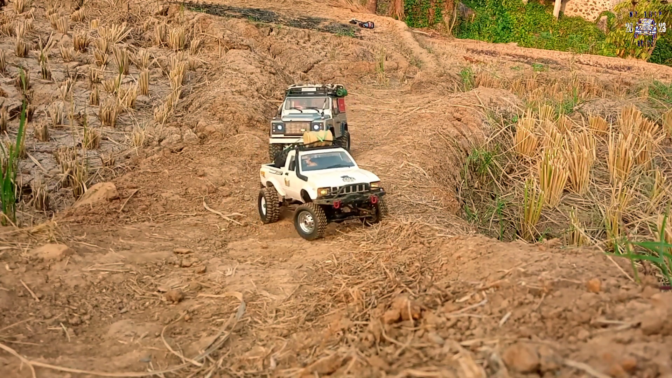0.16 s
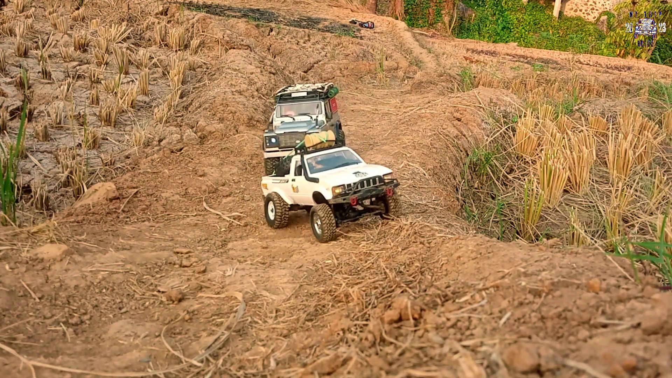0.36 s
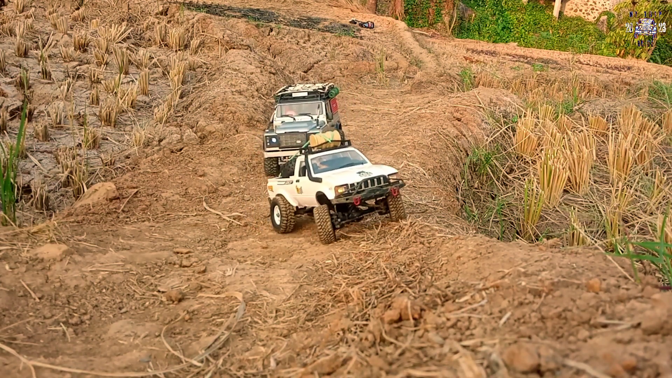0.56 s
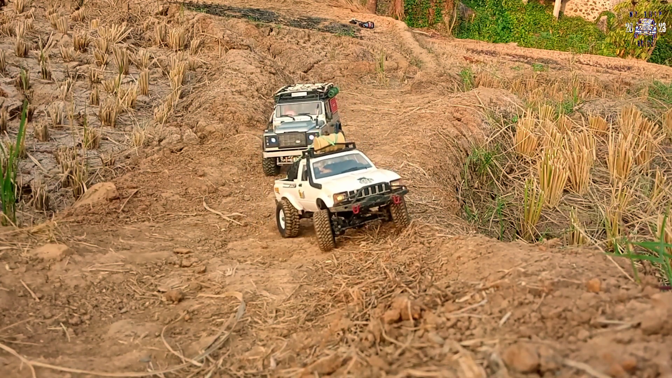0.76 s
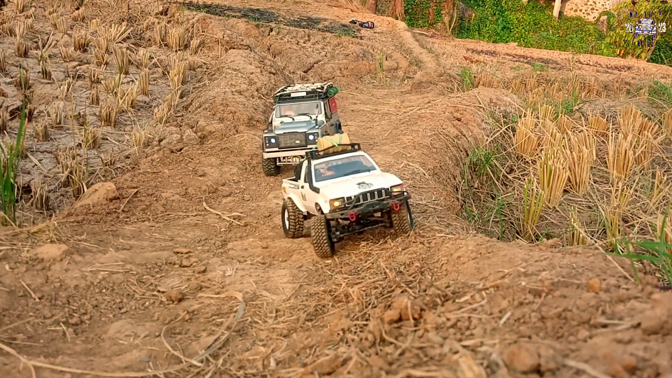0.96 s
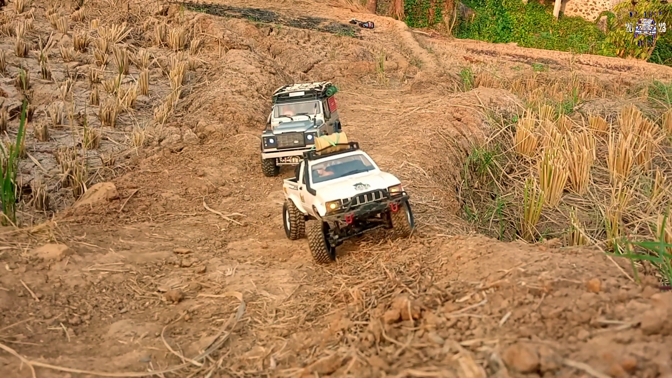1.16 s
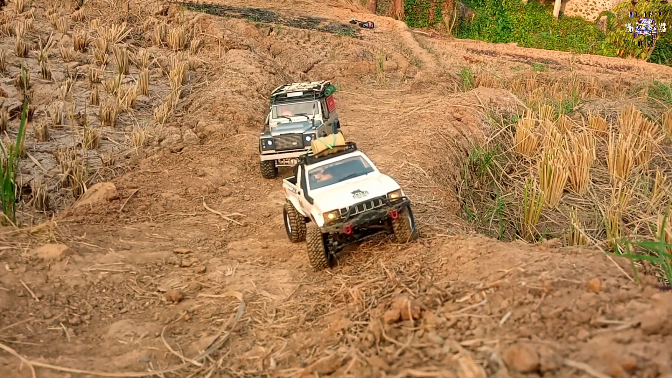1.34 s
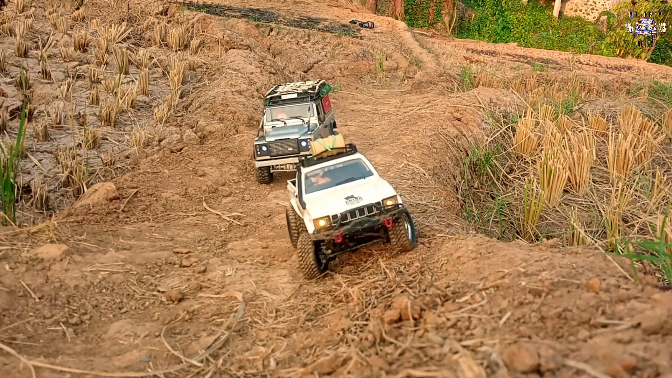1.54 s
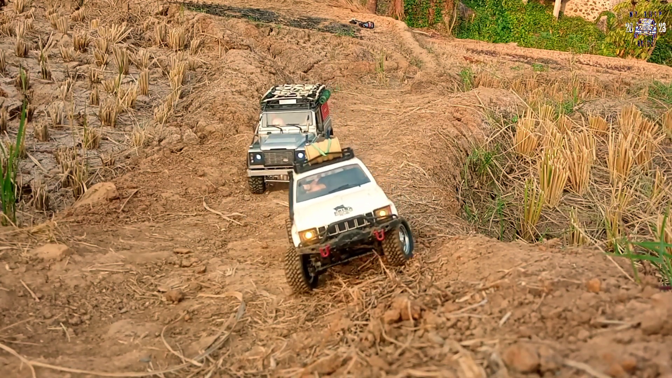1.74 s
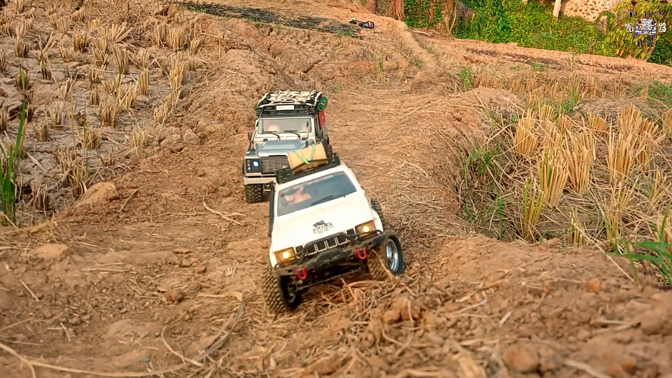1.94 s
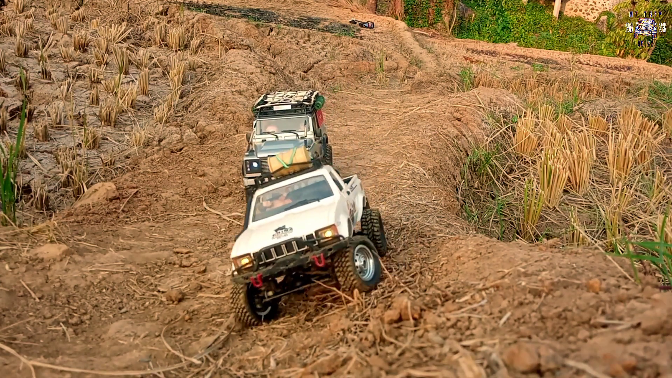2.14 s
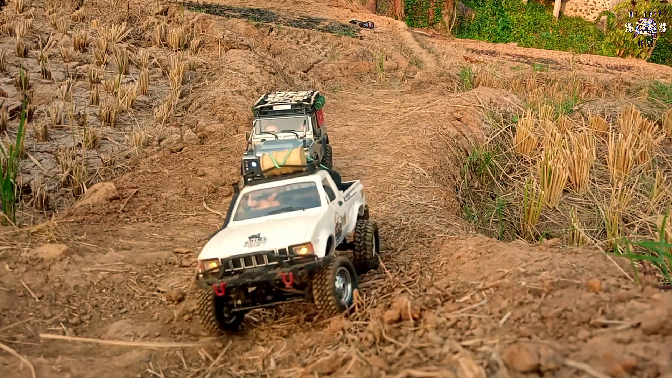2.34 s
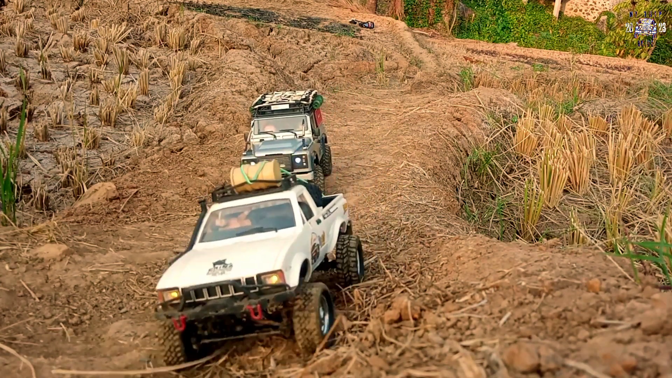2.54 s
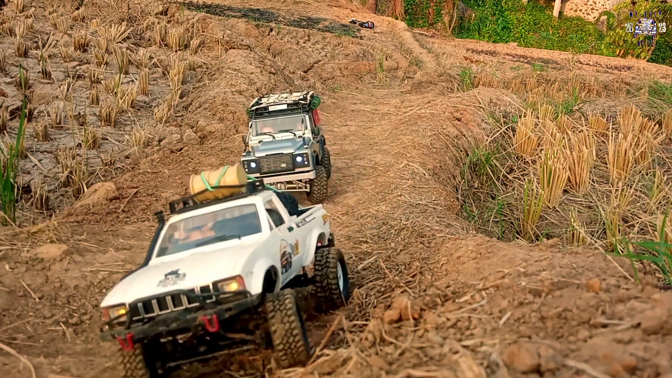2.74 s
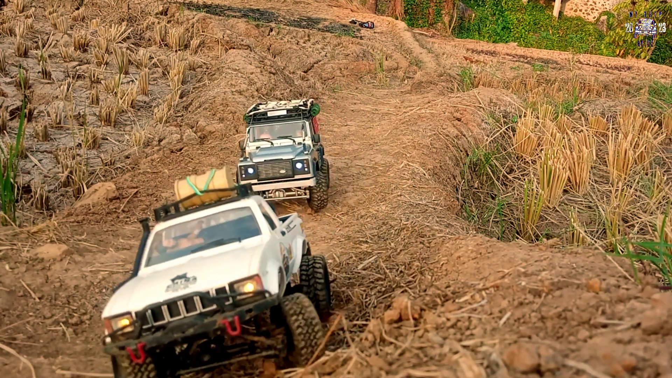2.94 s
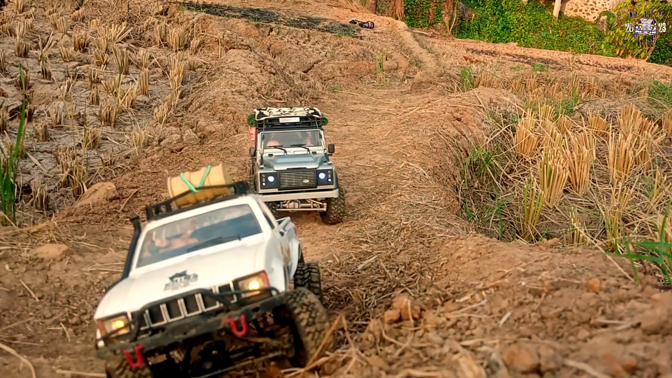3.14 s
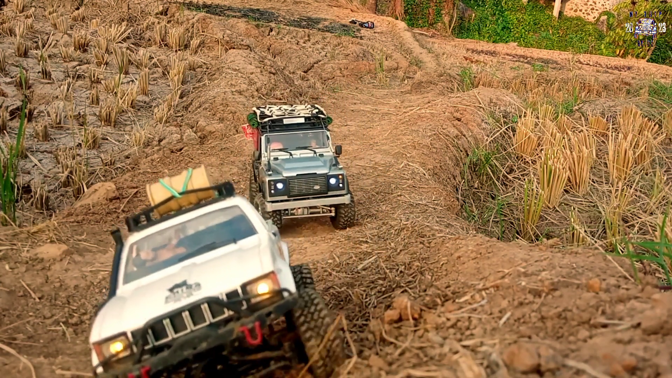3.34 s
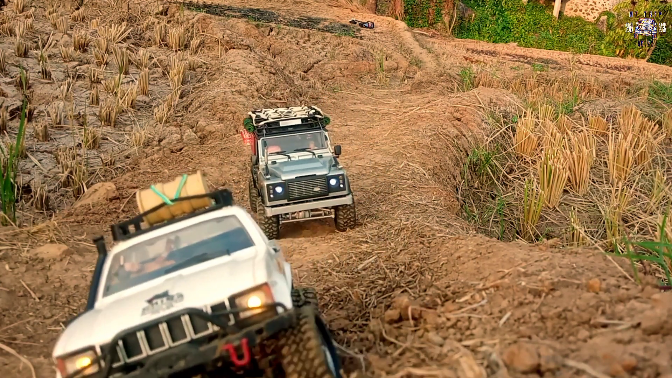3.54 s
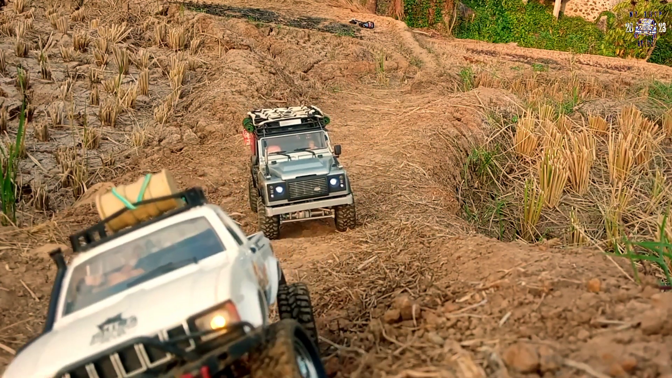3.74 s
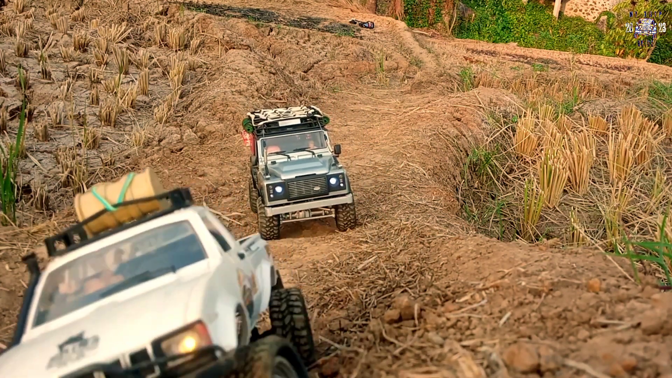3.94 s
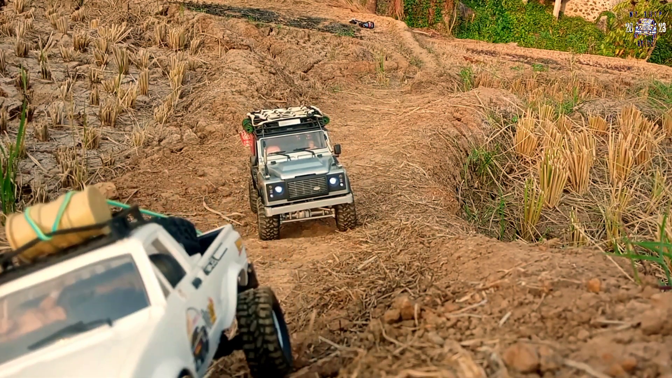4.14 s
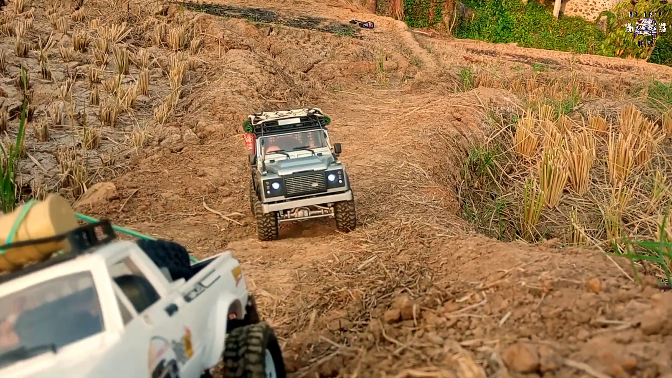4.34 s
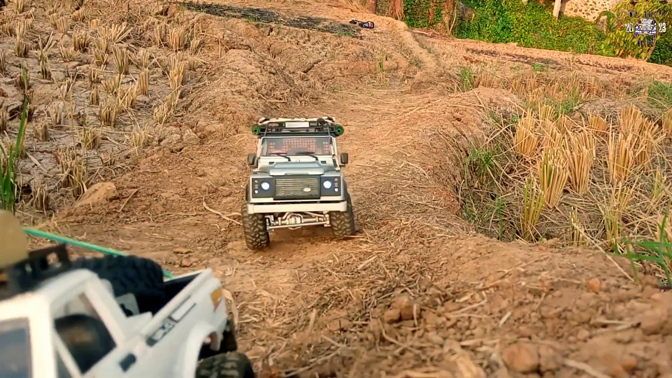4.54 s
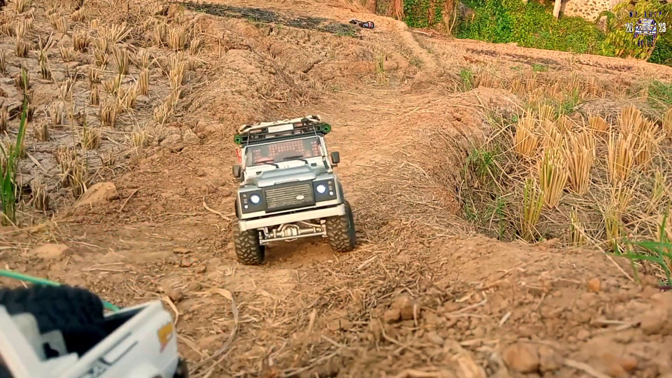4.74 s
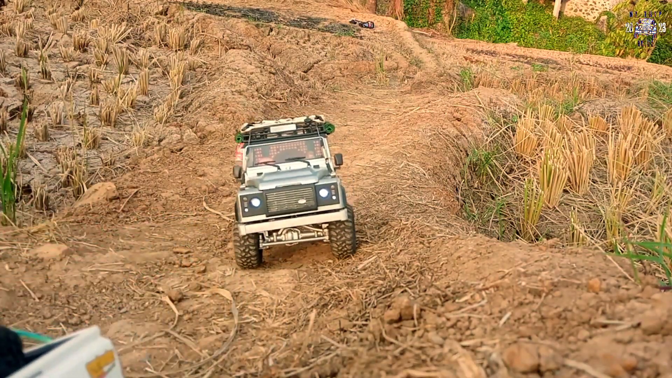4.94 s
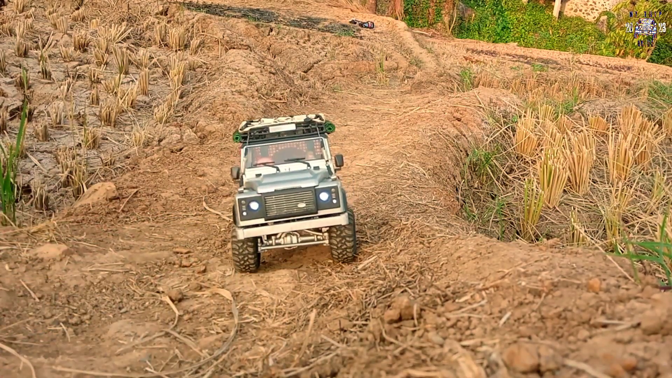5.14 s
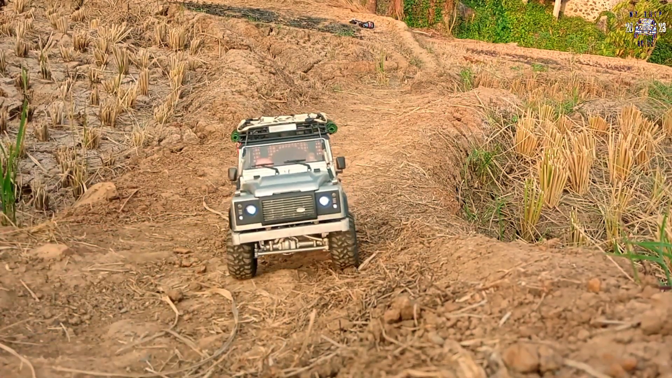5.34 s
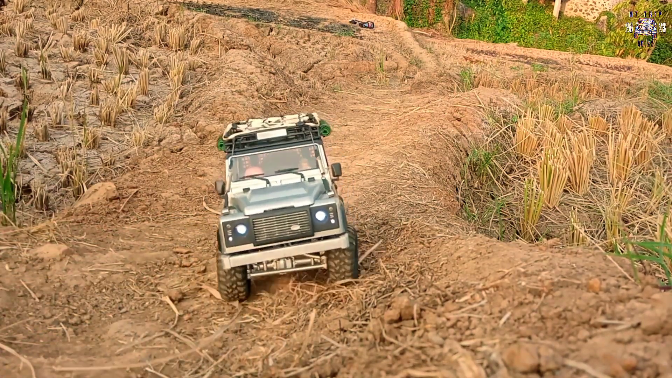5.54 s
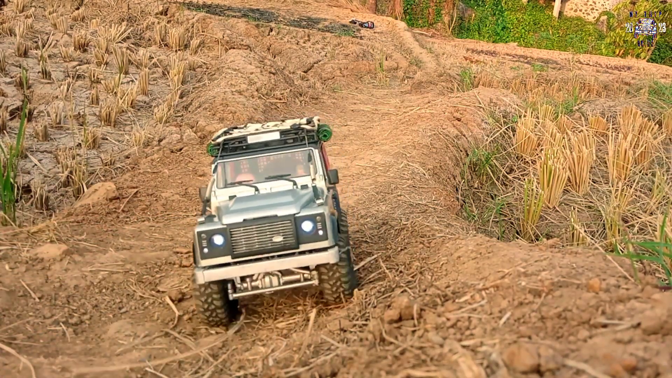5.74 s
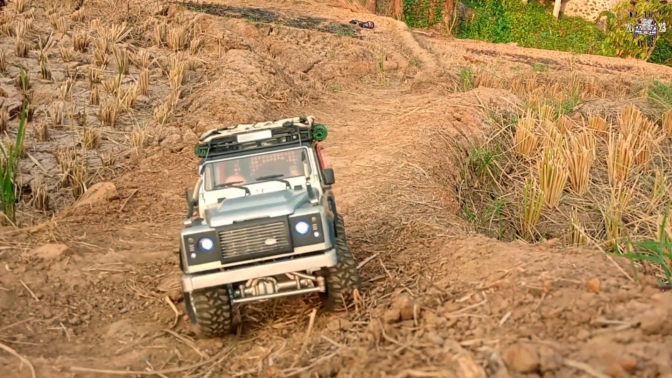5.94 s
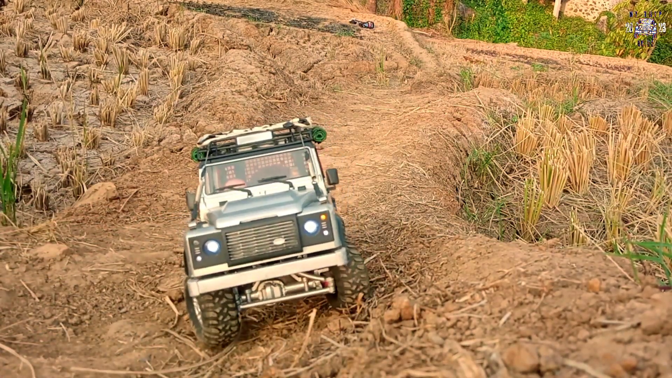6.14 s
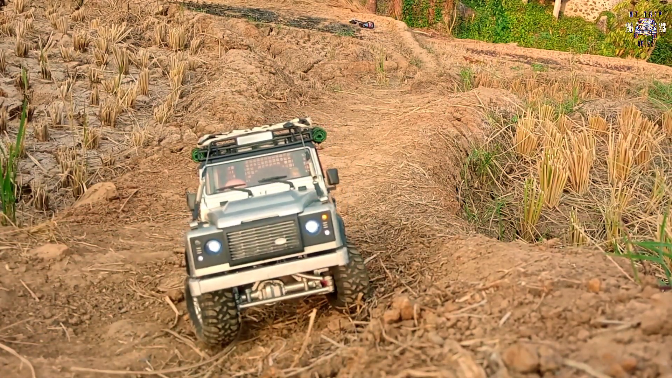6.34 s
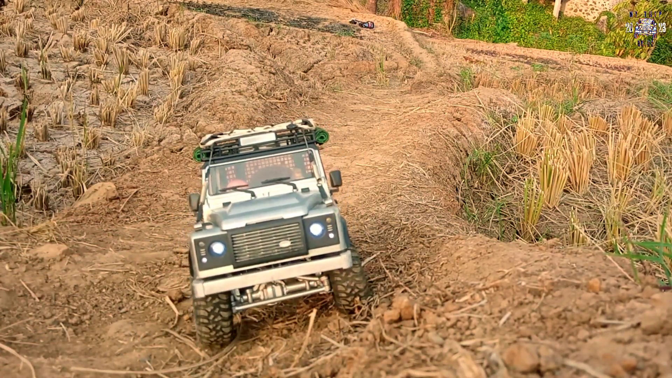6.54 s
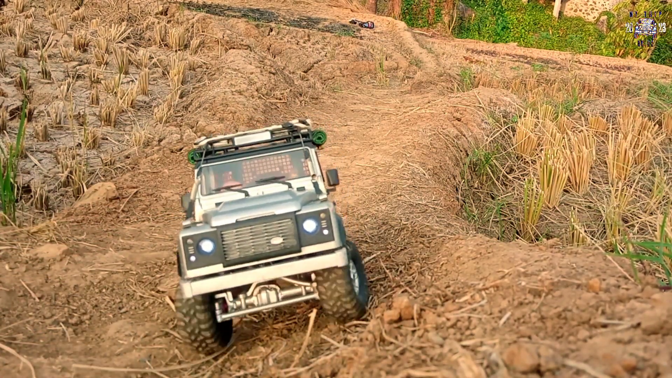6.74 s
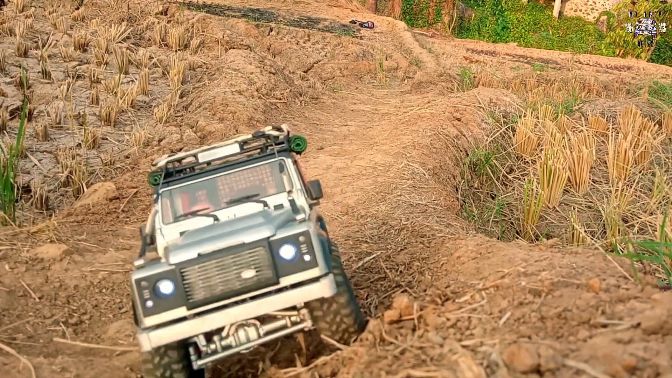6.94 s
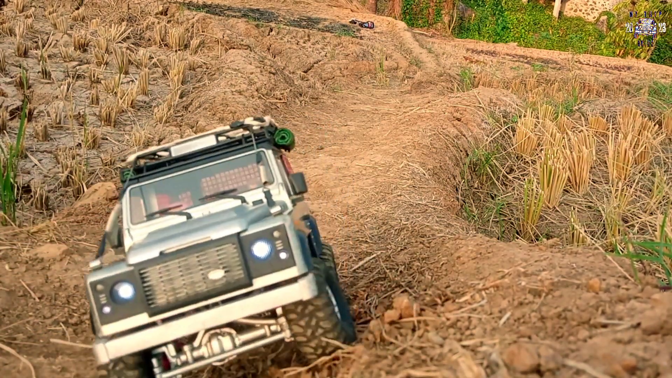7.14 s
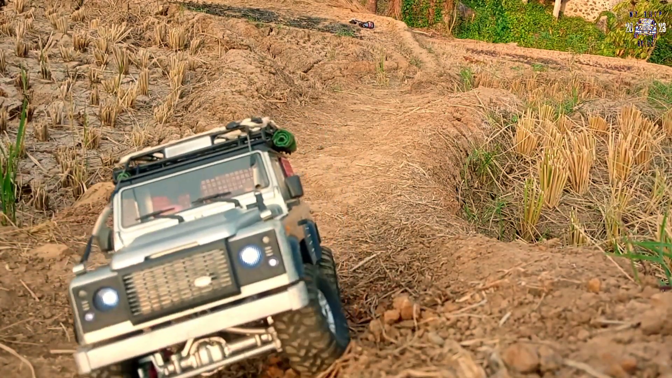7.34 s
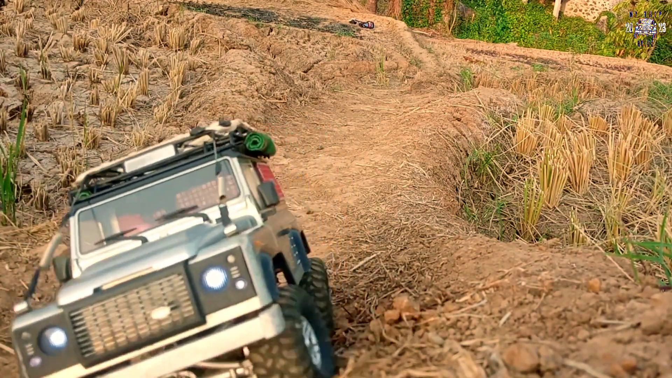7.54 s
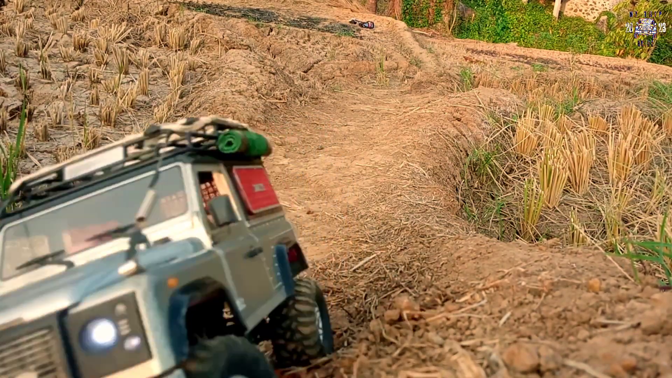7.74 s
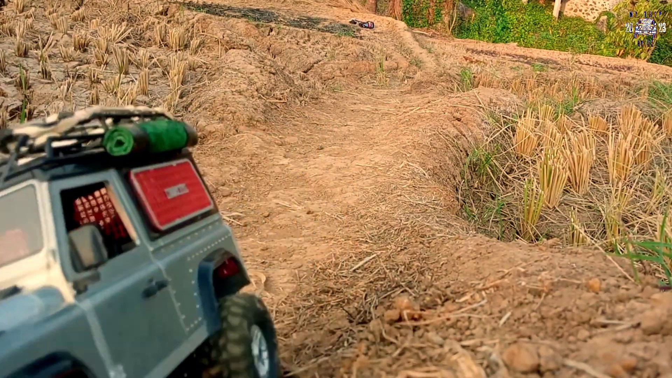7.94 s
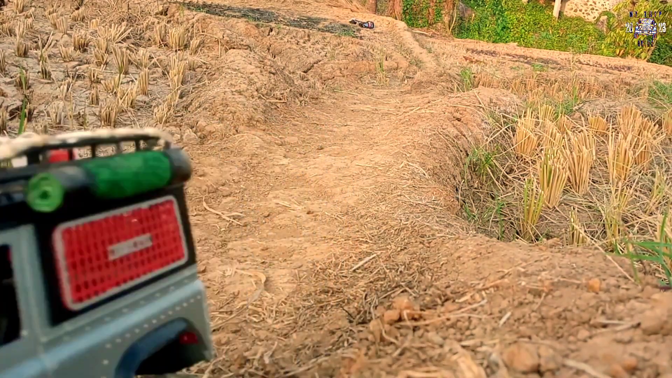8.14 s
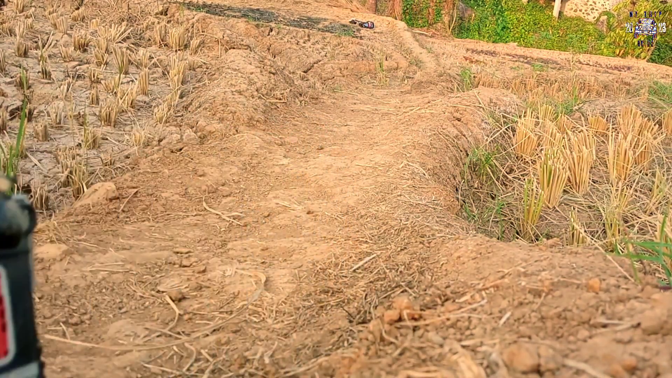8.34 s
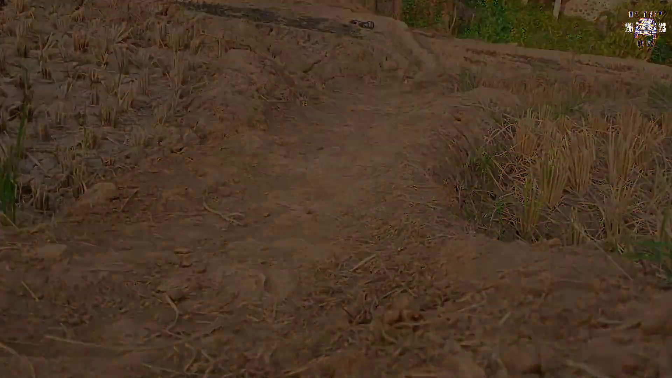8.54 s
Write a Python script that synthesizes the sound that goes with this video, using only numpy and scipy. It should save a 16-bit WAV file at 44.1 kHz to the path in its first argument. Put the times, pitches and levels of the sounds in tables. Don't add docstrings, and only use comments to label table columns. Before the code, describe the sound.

Thin motor-gear whine rises in uneven lurches as miniature off-road trucks grind over crumbly soil, pass close with two sharp snaps, then fade.

```python
import sys
import numpy as np
from scipy import signal
from scipy.fft import rfft, irfft, next_fast_len
from scipy.io import wavfile
from scipy.ndimage import uniform_filter1d

SR = 44100
rng = np.random.default_rng(int(sys.argv[2]) if len(sys.argv) > 2 else 0)


def wrap_up_sound(samples):
    columns = np.atleast_2d(samples).T
    tamed = np.clip(columns, -1, 1)
    steps = np.round(tamed * 32767).astype(np.int16)
    wavfile.write(sys.argv[1], SR, steps)


def makeup_ratio(level_db):
    decades = np.asarray(level_db, float) / 20
    return 10 ** decades


N = 383219

# [t/s, f/Hz]
THROTTLE = [(.16, 1850), (.38, 1680), (.6, 1720), (1.6, 2000), (1.74, 2250), (2.05, 2100), (2.4, 2200),
            (2.9, 2280), (3.0, 2050), (4.28, 2050), (4.36, 2380), (4.7, 2250), (5.2, 2250), (5.4, 1900),
            (5.535, 2150), (5.595, 3010), (6.4, 3250), (7.8, 3200)]
# [t/s, change/Hz, half
# length/s]
LURCHES = [(.118, 720, .06), (.51, 500, .075), (1.689, 330, .06), (1.834, 250, .055),
           (1.904, 320, .04), (1.994, -180, .04), (2.078, 100, .04), (2.177, 340, .03),
           (2.47, 300, .08), (2.56, 250, .06), (2.62, 400, .06), (2.7, 1000, .09), (2.8, 260, .045),
           (2.93, 850, .03), (3.375, 830, .055), (3.518, 800, .06), (3.595, -200, .04),
           (4.225, 450, .04), (4.368, 240, .04), (4.41, 140, .09), (4.9, 130, .09), (4.444, 200, .04),
           (4.49, 580, .035), (4.545, -200, .03), (4.618, 330, .04), (4.77, 250, .05),
           (4.818, 850, .05), (4.905, 420, .03), (4.966, 410, .035), (5.005, -150, .03),
           (5.129, 210, .1), (5.235, 130, .03), (5.285, -290, .035), (5.465, 620, .04),
           (5.632, 201, 0.042), (5.695, -330, 0.044), (5.8, -380, 0.053), (5.92, 450.5, .075),
                (6.0, 379, 0.059), (6.105, -480, 0.069), (6.238, 349.5, .045), (6.31, -830, 0.042),
                (6.35, -500, .04), (6.455, -180, .04), (6.58, 270, 0.051), (6.664, 400.5, .035),
                (6.728, 180, 0.029), (6.824, 551, 0.039), (6.87, -130, .03), (6.93, 379.5, .05),
                (6.98, 480, 0.046), (7.036, -140, 0.039), (7.105, 169.5, 0.059), (7.259, 281, 0.042),
                (7.361, 519.5, .045), (7.435, -500, 0.059), (7.526, 311, 0.039), (7.573, -140, .03),
                (7.63, 218.5, .04), (7.689, -320, 0.041), (7.75, 200, .045), (7.88, -950, .065),
                (7.96, -350, .07), (8.04, -650, 0.062)]
# [from/s, to/s, whine level/dB]
TEETH_PRESSED = [(.09, 0.169, -35), (.15, .285, -41), (.39, 0.534, -40.5), (.68, 0.995, -53),
                 (1.66, 2.02, -36), (2.048, 2.119, -38), (2.142, 2.22, -39), (2.357, 2.533, -38.5),
                 (2.52, 2.597, -43), (2.583, 2.792, -45.5), (2.77, 2.849, -40.5), (2.827, 2.984, -41.5),
                 (3.213, 3.253, -34), (3.34, 3.403, -46), (3.422, 3.47, -38), (3.46, 3.66, -37),
                 (4.19, 4.27, -35.5), (4.32, 4.556, -34.5), (4.551, 4.764, -36), (4.745, 5.008, -28),
                 (5.017, 5.27, -27.5), (5.252, 5.332, -31), (5.31, 5.364, -27), (5.34, 5.45, -33),
                 (5.43, 5.49, -29.5), (5.475, 5.513, -27), (5.51, 5.561, -25.5), (5.544, 5.598, -28),
                 (5.58, 5.681, -27), (5.659, 5.73, -28), (5.706, 5.786, -29), (5.756, 5.9, -34.5),
                 (5.892, 5.997, -27.5), (5.99, 6.079, -27.5), (6.058, 6.125, -29), (6.143, 6.283, -30),
                 (6.26, 6.323, -34), (6.338, 6.399, -29), (6.382, 6.564, -27.5), (6.57, 6.617, -30),
                 (6.65, 6.709, -31), (6.688, 6.753, -37.5), (6.743, 6.799, -31.5), (6.804, 6.863, -29),
                 (6.85, 6.914, -34), (6.898, 7.012, -35), (7.001, 7.073, -42), (7.062, 7.195, -34.5),
                 (7.211, 7.34, -35), (7.344, 7.406, -35), (7.388, 7.5, -33.5), (7.488, 7.56, -36.5),
                 (7.54, 7.622, -40), (7.603, 7.666, -36), (7.649, 7.734, -33), (7.715, 7.844, -37),
                 (7.82, 7.9, -38), (7.891, 8.05, -43.5), (8.035, 8.092, -33)]
# [f/Hz, level/dB]
WHINE_PATH = [(1700, -5), (2200, 0), (2550, -1), (2800, -4), (3150, 5), (3450, 6), (3800, 2)]
# [t/s, gear hiss level/dB, gearbox level over #
# the hiss/dB]
NEARNESS = [(.1, -43, 4), (.94, -48, 0), (1.15, -53.5, 3), (1.86, -44, 8), (2.35, -43.5, -5),
            (2.46, -40, -13), (2.98, -36.5, -10), (3.1, -41, 1), (3.56, -38, -15), (3.85, -41, -23),
            (4.5, -33.5, 8.5), (5.08, -37.5, 14.5), (5.5, -36, 8), (5.6, -27, 1.5), (7.75, -31, -5),
            (8.38, -34, -6.5), (8.45, -55, 4), (8.69, -67, 0)]
# [t/s, level/dB, half length/s]
HISS_SWELLS = [(0, -4.5, 0.21), (4.79, 1, 0.06), (5.96, 2.5, 0.18), (6.29, -0.5, .04), (6.61, 1, 0.11),
               (7.53, -2, 0.028), (7.89, 2, 0.064), (8.05, 5, 0.13), (8.13, -3.5, 0.086), (8.23, 4.5, 0.038),
               (8.29, -1, .03), (8.37, 2.5, 0.034)]
# [multiple, level/dB, blur/Hz]
MULTIPLES = [(.5, -4, 90), (.62, -7, 120), (1.5, -7, 240), (2.45, -8, 350), (3, -6.5, 240), (3.5, -9, 400),
             (3.8, -9, 450)]
# [f/Hz, level/dB]
MULTIPLE_PATH = [(3900, 0.5), (4600, 1.5), (5200, -5), (7000, 1), (8000, -2.5), (11000, 3.5), (13000, -11)]
# [f/Hz, level/dB]
OCTAVE_PATH = [(4300, -32), (4900, -20), (5500, -15), (6600, -13), (7000, -17), (7600, -22)]
# [f/Hz, level/dB per Hz]
HISS_FRONT = [(2290, -25), (3900, -8), (4020, -11), (4510, -10), (5010, -16), (5500, -10), (6940, -10.5),
              (8710, -2.5), (10300, -7.5), (15000, -27), (15700, -17)]
# [f/Hz, level/dB per Hz]
HISS_BEHIND = [(2290, -15.5), (3900, -10), (5530, -21), (6590, -14), (7150, -17.5), (8760, -2),
               (10800, -31.5), (11800, -25), (13000, -22), (15700, -32)]
# [f/Hz, width/Hz, lift/dB]
SHELL = [(1324, 210, 13), (1850, 40, 7.5), (3403, 710, 12), (5640, 300, 2), (6300, 130, 0),
         (7520, 160, 2.5), (8450, 200, 3), (9400, 180, -3.5), (9530, 240, 4.5), (11330, 310, 4)]
# [f/Hz, width/Hz, level/dB]
GEARBOX = [(3280, 410, 6.5), (3437, 31, 7), (3750, 180, -4.5)]
# [from/s, to/s, from f/Hz, to f/Hz, level/dB]
PANELS = [(.7, 0.962, 3480, 3290, -43), (.79, 0.958, 2520, 2450, -49), (2.28, 2.62, 11400, 11700, -56),
          (2.42, 2.47, 12100, 12200, -52), (2.4, 2.63, 3460, 3920, -47), (2.6, 2.774, 9400, 9600, -39),
          (3.1, 3.8, 11200, 11400, -54), (3.34, 3.44, 8700, 9000, -44), (3.35, 3.45, 14800, 15100, -58),
          (4.1, 4.5, 9650, 9540, -47), (4.28, 4.88, 11300, 11600, -48), (4.35, 4.75, 13500, 13200, -56),
          (0, 0.503, 3550, 3510, -45), (4.3, 4.648, 3760, 3900, -39.5), (5.42, 5.56, 4250, 4400, -41),
          (5.56, 5.92, 4550, 4320, -40), (5.8, 6.3, 5610, 5570, -43.5), (5.551, 6.12, 1500, 1450, -42.5),
          (6.3, 7.05, 1850, 1850, -43), (5.85, 5.995, 8300, 9000, -25.5), (6.213, 6.268, 8700, 8800, -38),
          (6.35, 6.5, 10900, 11400, -44), (6.451, 6.599, 9500, 10480, -41), (6.491, 6.678, 8000, 8870, -34),
          (6.699, 6.83, 10000, 9900, -31), (6.89, 7.0, 8560, 9200, -33), (6.88, 6.998, 10200, 11200, -38),
          (6.9, 7.0, 7230, 7600, -38), (7.019, 7.122, 9400, 9900, -36), (7.2, 7.357, 10060, 11200, -37),
          (7.46, 7.56, 8900, 8600, -38), (7.46, 7.56, 10100, 10600, -35)]
# [from/s, to/s, f/Hz, level/dB]
GEAR_TONES = [(.78, 1.053, 1590, -49), (2.617, 2.698, 1500, -46), (3.35, 3.427, 5910, -46),
              (2.45, 2.582, 1588, -47), (5.701, 5.832, 1498, -39), (5.901, 5.979, 1720, -38),
              (6.22, 6.27, 1800, -36), (6.9, 6.948, 1850, -38), (7.49, 7.54, 1795, -37.5),
              (7.9, 8.001, 3480, -47), (6.42, 6.501, 1900, -41), (6.55, 6.688, 1820, -34),
              (6.792, 6.839, 1867, -28.5), (6.948, 7.01, 1880, -30), (7.329, 7.38, 1850, -35),
              (8.203, 8.243, 3800, -37), (8.26, 8.32, 6600, -39)]
# [t/s, level/dB]
SERVO = [
    [(7.6, -56), (7.728, -45), (8.35, -61)],
]
# [f/Hz, level/dB per Hz]
SOIL = [(210, -14), (350, -15), (394, -8.5), (493, -8.5), (585, -15.5), (724, -4), (1610, -1.5),
        (2220, -2.5), (3410, -5), (4500, -17.5), (5850, -27), (9900, -120)]
# [from/s, to/s, extra level/dB]
LOOSE_SOIL = (4.4, 6.34, 2.74)
# [from/s, to/s, level/dB, f/Hz, half width/Hz]
SCRAPE = (8, 8.5, -41, 691, 398)
# [t/s, peak level/dB, f/Hz]
CLODS = [(0.089, -13.5, 824), (0.184, -15, 1290), (0.267, -16, 2000), (0.382, -16, 1000),
         (0.794, -17.5, 1170), (1.89, -27, 2530), (2.451, -14, 2470), (2.509, -29, 1606),
         (2.899, -11, 1500), (2.969, -13, 1268), (3.152, -14, 900), (3.791, -29, 2540), (3.989, -21, 1410),
         (4.046, -9, 1240), (4.207, -11.5, 2400), (4.977, -8, 2380), (5.433, -8, 2320), (5.983, -3.5, 1850),
         (6.039, -6.5, 1180), (6.083, -15, 2773), (6.345, -9, 2880), (6.566, -6, 2900),
         (6.904, -11.5, 1820), (7.809, -9.5, 2350), (7.991, -13, 2766), (8.007, -11, 754),
         (8.233, -8, 2490), (8.438, -23, 2590), (8.481, -22, 1850), (8.598, -18.5, 2600)]
# [t/s, peak level/dB]
GRIT_CRACKS = [
    (0.5871, -32),
    (2.4488, -25),
    (2.9627, -24),
    (5.4321, -18),
    (5.5864, -17),
    (5.9833, -10),
    (6.5656, -13),
    (7.9994, -21),
]
# [t/s, peak level/dB]
SNAPS = [
    (8.108, -3),
    (8.385, -3.5),
]
# [f/Hz, level/dB, time to fall 60 dB/s]
STALK = [(2650, -2.5, 0.041), (3170, 7.5, 0.011), (4980, -18, 0.023), (5560, -31, 0.022), (7700, -11, 0.03),
         (8200, -6, 0.02)]
# [t/s, peak level/dB, f/Hz]
KNOCKS = [
    (4.551, -28, 740),
    (4.8, -27, 648.5),
    (6.96, -25.5, 690),
    (7.74, -22, 709.3),
    (8.09, -24, 445),
    (8.26, -21.5, 653),
]
# [t/s, peak level/dB, f/Hz, time to fall 60 dB/s]
STAND_BUMP = (8.339, -15, 82, .12)
# [t/s, level/dB]
DRONE = [
    (0.0, -43),
    (0.02, -37),
    (2.76, -37),
    (2.95, -35),
    (6.41, -37),
    (8.3, -33),
    (8.35, -30.5),
    (8.42, -43),
    (8.69, -41.5),
]
# [f/Hz, level/dB per Hz]
RUMBLE = [(15, -58), (25, -22), (37, -32), (52, -13.5), (75, -3.5), (156, 3), (259, -5), (306, -4.5),
          (395, -12.5), (494, -11), (574, -14), (687, -14.5), (900, -29), (1170, -25), (1980, -120)]
# [from f/Hz, to f/Hz, level/dB, from/s, to/s]
ENGINE_TONES = [(356, 366, -52, 0.526, 1.7), (417, 710, -72, 0.23, 1), (483, 486, -50.5, 0.15, 1.52),
                (557, 420, -56, 0.088, 1.3), (299, 312, -47.5, 1.46, 5.2), (155.4, 166, -43.5, 2.28, 8.4),
                (209.5, 150, -49, 1.1, 2.4), (193.4, 240, -45, 4.3, 6.1), (1031, 1012, -56.5, 0.32, 6.36)]
# [f/Hz, level/dB per Hz]
INSECTS = [(9000, -30), (10500, -11), (11600, -9), (13000, 2), (15500, -8)]
# [f/Hz, level/dB per Hz]
AIR = [(180, -41), (300, 4), (710, 4.5), (1250, -35), (2670, -9), (2950, -51), (5440, -5.5), (8790, 4),
       (15700, -60)]

TEETH = 12
IDLE_DB, BITE_S = -68, .022
SLIP_DB_PER_KHZ = 5.5
CRUSH_DB, CRUSH_GROWS = -36.5, 0.34
CASE_HZ, CASE_WIDTH_HZ, CASE_FEEDS = 3450, 400, .7


def unit(x):
    return x / np.sqrt(np.mean(np.abs(x) ** 2) + 1e-20)


def along(points, hz):
    f, v = np.transpose(points)
    return np.interp(np.log(hz + 1), np.log(f + 1), v)


def curves(rows, round_s=.01):
    s, *cols = np.transpose(rows)
    t = np.arange(N) / SR
    return [uniform_filter1d(np.interp(t, s, c), int(round_s * SR)) for c in cols]


def wobble(rate):
    place = np.arange(N) * rate / SR
    knot = place.astype(int)
    knots = rng.standard_normal(int(place[-1]) + 2)
    share = place - knot
    eased = share * share * (3 - 2 * share)
    return unit(knots[knot] + eased * np.diff(knots)[knot])


def gate(start, end, edge_s):
    t = np.arange(N) / SR
    return np.clip(np.minimum(t - start, end - t) / edge_s, 0, 1)


def bumps(rows):
    out = np.zeros(N)
    for s, height, half_s in rows:
        u = np.arange(-1, 1, 1 / (half_s * SR))
        u = u[round(max(half_s - s, 0) * SR):]
        add(out, max(s - half_s, 0), height * np.cos(np.pi * u / 2) ** 2)
    return out


def noise():
    return rng.standard_normal(N)


def filtered(x, response):
    m = next_fast_len(N + 8192)
    spectrum = rfft(x, m) * response(np.fft.rfftfreq(m, 1 / SR))
    return unit(irfft(spectrum, m)[:N])


def shaped(x, points):
    return filtered(x, lambda f: makeup_ratio(along(points, f)))


def around(f, hz, width):
    return 1 / (1 + ((f - hz) / width) ** 4)


def resonance(f, hz, width):
    return 1 / (1 + ((f - hz) / width * 2) ** 2)


def patchy(patchy_db):
    z = signal.stft(rng.standard_normal(N + 512), nperseg=256)[2]
    field = uniform_filter1d(rng.standard_normal(z.shape), size=2, axis=0)
    field = uniform_filter1d(field, size=16, axis=1)
    return signal.istft(z * makeup_ratio(patchy_db * unit(field)), nperseg=256)[1][:N]


def add(out, s, sound):
    part = out[round(s * SR):][:len(sound)]
    part += sound[:len(part)]


def whine(hz, db, shake, flutter_db):
    phase = 2 * np.pi * np.cumsum(hz) / SR
    size = makeup_ratio(db + flutter_db * wobble(140))
    return np.sqrt(2) * size * np.sin(phase + shake * wobble(300)), phase


def motion():
    lurch = bumps(LURCHES)
    hz = curves(THROTTLE)[0] + lurch
    pressed_db = np.max([(db - IDLE_DB) * gate(start - BITE_S / 2, end, BITE_S)
                         for start, end, db in TEETH_PRESSED], axis=0)
    whine_db = IDLE_DB + pressed_db + along(WHINE_PATH, hz)
    hiss_db, ring_db = curves(NEARNESS)
    hiss_db = hiss_db + SLIP_DB_PER_KHZ * lurch / 1000 + bumps(HISS_SWELLS)
    return hz, whine_db, hiss_db, ring_db


def shell_lift(f):
    return sum(lift_db * resonance(f, hz, width) for hz, width, lift_db in SHELL)


def tooth_multiples(hz, phase, db, hiss_db, ring_db, turning):
    out = np.zeros(N)
    for k, rel_db, blur in MULTIPLES:
        radiated_db = np.maximum(along(HISS_FRONT, k * hz), -14) + shell_lift(k * hz)
        in_case = around(k * hz, CASE_HZ, CASE_WIDTH_HZ)
        radiated_db = radiated_db + CASE_FEEDS * np.maximum(ring_db + 4.0, 0) * in_case
        path_db = along(MULTIPLE_PATH, k * hz) + 1.2 * wobble(18)
        level = makeup_ratio(.3 * db + .7 * hiss_db + rel_db + radiated_db + path_db)
        blurred = wobble(blur) * np.sin(k * phase) + wobble(blur) * np.cos(k * phase)
        out += turning * level * blurred
    return out


def tooth_octave(hz, db, hiss_db):
    meshing = np.clip((db - hiss_db + 19) / 8, 0, 1)
    passing_db = -8 * gate(7.35, 9.5, edge_s=.3)
    octave_db = hiss_db + along(OCTAVE_PATH, 2 * hz) + 2.5 * wobble(22) + passing_db
    return meshing * whine(2 * hz, octave_db, shake=1.1, flutter_db=3.5)[0]


def gear_hiss(phase, chatter_db):
    turn = 1 + 0.12 * np.cos(phase / TEETH + 2.1 * wobble(40))
    rattle = patchy(patchy_db=3.0) * turn * makeup_ratio(chatter_db)
    passed = gate(7.5, 9.5, edge_s=0.44)
    front = filtered(rattle, lambda f: makeup_ratio(along(HISS_FRONT, f) + shell_lift(f)))
    return (1 - passed) * front + passed * shaped(rattle, HISS_BEHIND)


def gearbox_ring(chatter_db):
    def case(f):
        return sum(makeup_ratio(db) * resonance(f, hz, width) for hz, width, db in GEARBOX)
    return filtered(patchy(patchy_db=2) * makeup_ratio(.6 * chatter_db), case)


def gears():
    hz, db, hiss_db, ring_db = motion()
    hz = hz * (1 + .004 * wobble(45) + .006 * wobble(130))
    grip_db = 1.2 + 2.4 * np.clip(wobble(70), -1.8, .5)
    tone, phase = whine(hz, db + grip_db, shake=.7, flutter_db=2.8)
    turning = np.clip((db - hiss_db + 14) / 8, 0, 1)
    tone = tone + tooth_multiples(hz, phase, db, hiss_db, ring_db, turning)
    tone = tone + tooth_octave(hz, db, hiss_db)
    chatter_db = 1.6 * wobble(55) + 1.1 * wobble(110)
    crowd_db = -16 * around(hz, 3400, 600) * turning
    crowd_db = crowd_db - turning * (3 + 7 * (1 - around(1.5 * hz, CASE_HZ, CASE_WIDTH_HZ)))
    hiss = makeup_ratio(hiss_db + 0.2) * gear_hiss(phase, chatter_db)
    return tone + hiss + makeup_ratio(hiss_db + ring_db + crowd_db - 3.0) * gearbox_ring(chatter_db)


def panels():
    out, t = np.zeros(N), np.arange(N) / SR
    shimmer = wobble(400), wobble(400)
    for start, end, from_hz, to_hz, db in PANELS:
        near = slice(round(start * SR), round(end * SR))
        hz = np.interp(t[near], [start, end], [from_hz, to_hz])
        phase = 2 * np.pi * np.cumsum(hz) / SR
        shift = rng.integers(N // 2)
        a, b = (w[shift:][:len(phase)] for w in shimmer)
        level = makeup_ratio(db) * gate(start, end, edge_s=0.02)[near]
        out[near] += level * (a * np.sin(phase) + b * np.cos(phase))
    return out


def gear_tones():
    hz, size = np.full(N, 1800.), np.zeros(N)
    for start, end, tone_hz, db in GEAR_TONES:
        hz[round(start * SR):round(end * SR)] = tone_hz
        size += makeup_ratio(db) * gate(start, end, edge_s=0.011)
    return size * whine(hz * (1 + .01 * wobble(25)), 0, shake=.5, flutter_db=2.5)[0]


def steering_servo():
    (db,) = curves([(7.5, -90)] + list(SERVO[0]) + [(8.4, -94)])
    return makeup_ratio(db - 3.0) * filtered(noise(), lambda f: around(f, 13400, 350))


def tyres():
    soft_from, soft_to, soft_db = LOOSE_SOIL
    crush_db = CRUSH_DB + CRUSH_GROWS * (motion()[2] + 34)
    crush_db = crush_db + soft_db * gate(soft_from, soft_to, edge_s=0.12)
    lands = rng.random(N) < 900 / SR
    grain_db = np.minimum(5 * rng.exponential(size=N), 14)
    grit = lands * makeup_ratio(grain_db) * noise()
    crush = patchy(patchy_db=2.0) * makeup_ratio(1.26 * wobble(18)) + 0.5 * unit(grit)
    start, end, db, hz, width = SCRAPE
    scrape = filtered(crush, lambda f: around(f, hz, width))
    scrape = makeup_ratio(db + 5.9 * wobble(21)) * gate(start, end, edge_s=0.14) * scrape
    return makeup_ratio(crush_db + 1.5) * shaped(crush, SOIL) + scrape


def hit_time():
    return np.arange(SR // 8) / SR


def band(lo_hz, hi_hz):
    b, a = signal.butter(2, [lo_hz, hi_hz], "band", fs=SR)
    return unit(signal.lfilter(b, a, rng.standard_normal(SR // 8)))


def clods():
    out, t = np.zeros(N), hit_time()
    for s, db, hz in CLODS:
        crumble = makeup_ratio(db - 8 - 60 * t / .035) * (1 - np.exp(-t / .0035))
        add(out, s, crumble * (band(hz / 1.8, hz * 1.8) + .07 * band(5000, 11000)))
    for s, db in GRIT_CRACKS:
        add(out, s, makeup_ratio(db - 12 - 60 * t / 0.011) * band(2000, 9500))
    return out


def stalks():
    out, t = np.zeros(N), hit_time()
    for s, db in SNAPS:
        ring = sum(makeup_ratio(g - 60 * t / life) * np.sin(2 * np.pi * hz * t) for hz, g, life in STALK)
        burst = makeup_ratio(-60 * t / 0.022) * band(1850, 2900)
        add(out, s, makeup_ratio(db) * (1 - np.exp(-t / 0.0004)) * (0.39 * ring + 0.38 * burst))
    return out


def chassis_knocks():
    out, t = np.zeros(N), hit_time()
    for s, db, hz in KNOCKS:
        swell = t / 0.018 * np.exp(1 - t / 0.022)
        add(out, s - .03, makeup_ratio(db - 11.0) * swell * band(hz / 1.13, hz * 1.39))
    return out


def stand_bump():
    out, t = np.zeros(N), hit_time()
    s, db, hz, t60 = STAND_BUMP
    add(out, s, -makeup_ratio(db - 60 * t / t60) * np.sin(2 * np.pi * hz * t * (1 + 3 * t)))
    return out


def far_engine():
    (db,) = curves(DRONE)
    out = makeup_ratio(db + 0.9 * wobble(13)) * shaped(noise(), RUMBLE)
    for from_hz, to_hz, tone_db, start, end in ENGINE_TONES:
        hz = np.interp(np.arange(N) / SR, [start, end], [from_hz, to_hz])
        tone = np.sin(2 * np.pi * np.cumsum(hz) / SR + 1.17 * wobble(8))
        level = makeup_ratio(tone_db + 4.0 + 1.0 * wobble(11))
        out = out + gate(start, end, edge_s=0.15) * level * tone
    return out


def outdoors():
    chirr = makeup_ratio(-63) * (.5 + .5 * gate(-1, 8.4, edge_s=.05)) * shaped(patchy(patchy_db=5.0), INSECTS)
    return chirr + makeup_ratio(-51.0) * shaped(noise(), AIR)


def scene():
    trucks = gears() + panels() + gear_tones() + steering_servo()
    ground = tyres() + clods() + stalks() + chassis_knocks() + stand_bump()
    return (trucks + ground + far_engine() + outdoors())[None]


def top_cut(x):
    return signal.sosfilt(signal.butter(12, 15520, fs=SR, output="sos"), x)


def record(dry):
    no_bass = signal.butter(3, 42, "high", fs=SR, output="sos")
    no_top = signal.ellip(10, .5, 70, 15500, fs=SR, output="sos")
    mix = signal.sosfilt(no_top, signal.sosfilt(no_bass, dry))
    return top_cut(mix)


dry = scene()
out = record(dry)
wrap_up_sound(out)
```